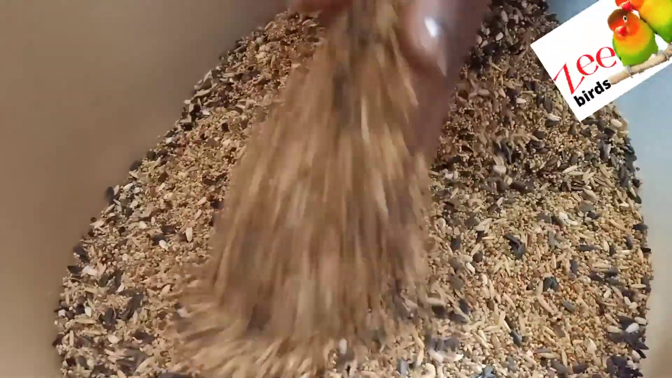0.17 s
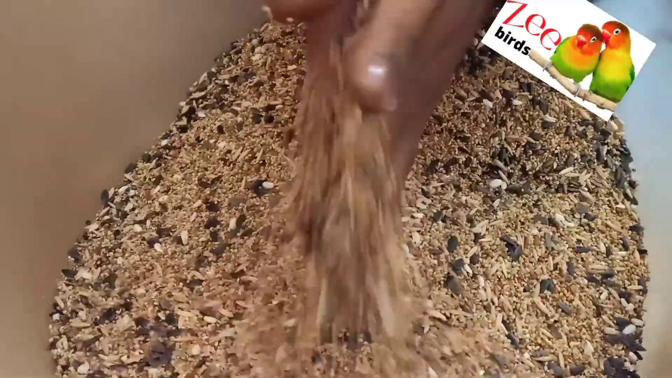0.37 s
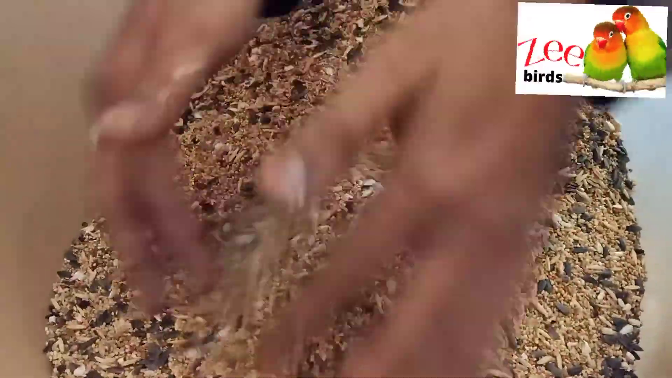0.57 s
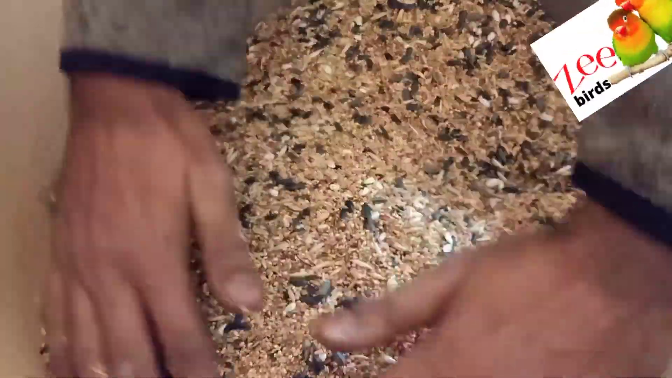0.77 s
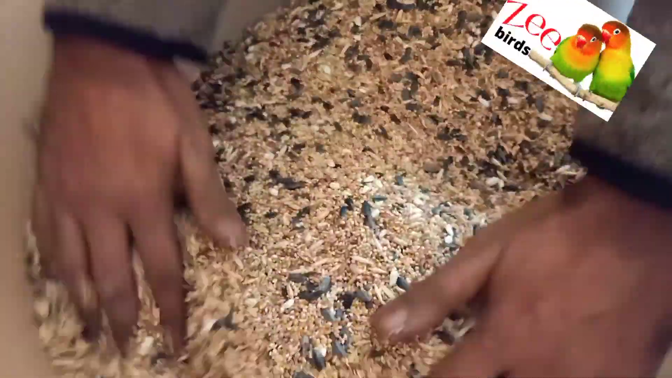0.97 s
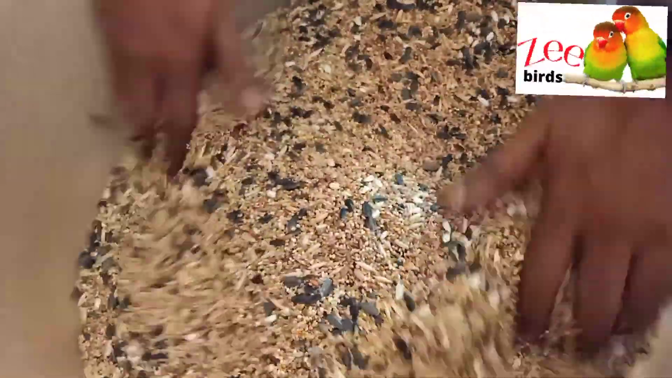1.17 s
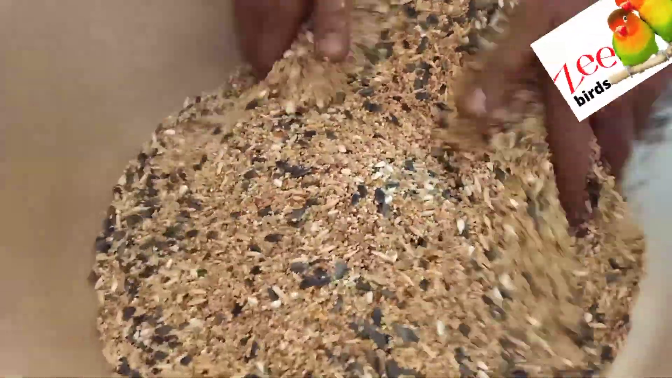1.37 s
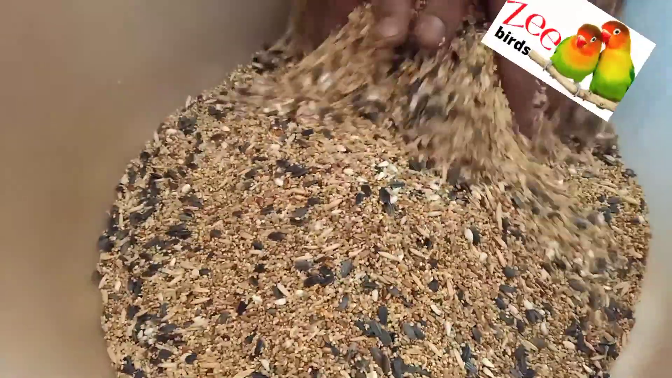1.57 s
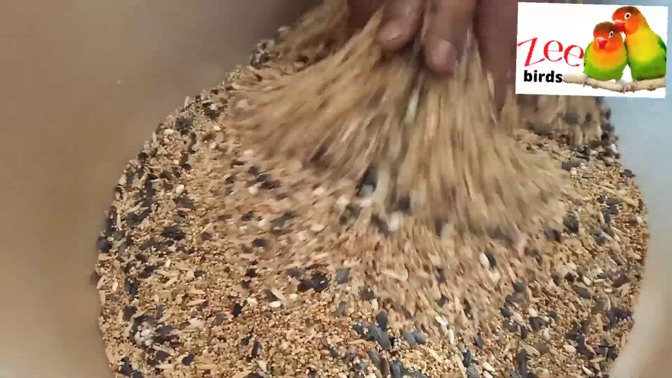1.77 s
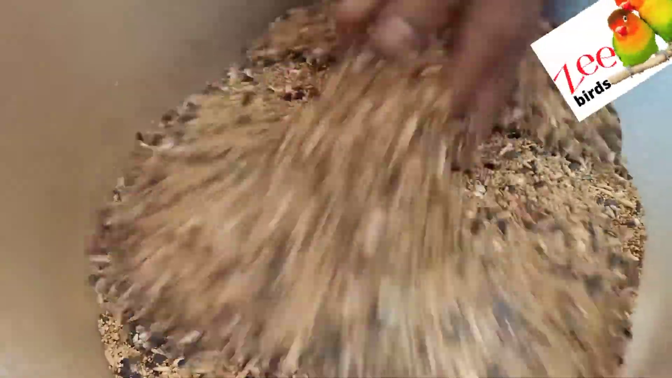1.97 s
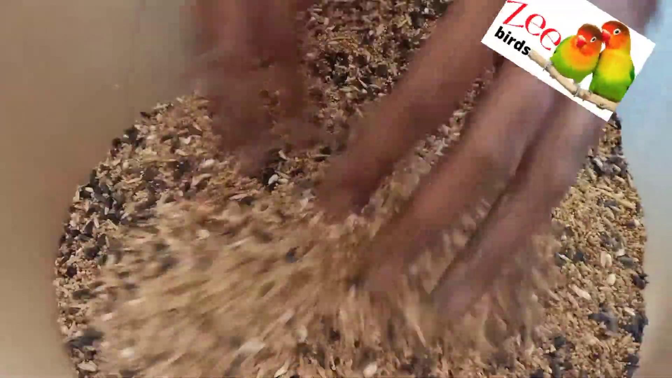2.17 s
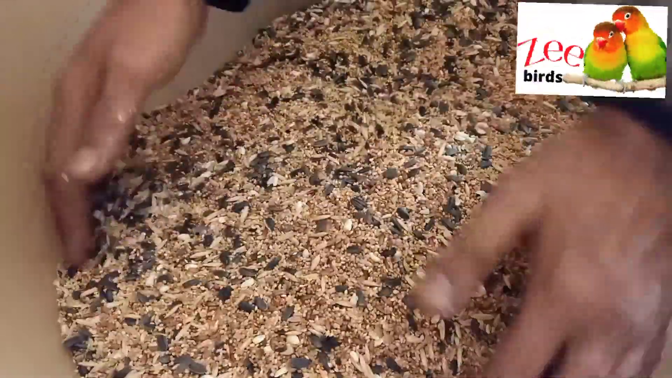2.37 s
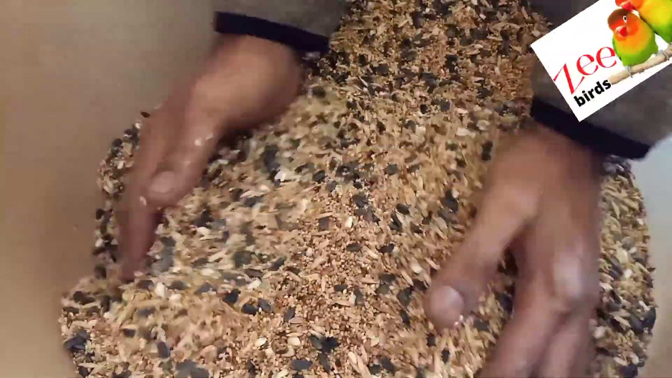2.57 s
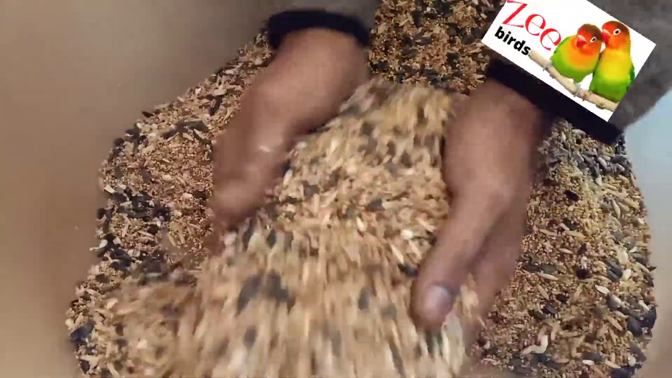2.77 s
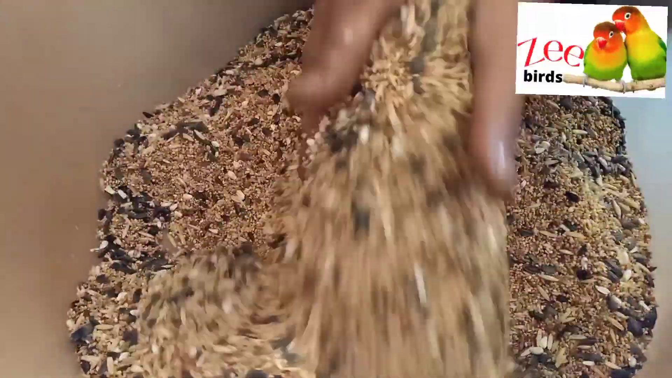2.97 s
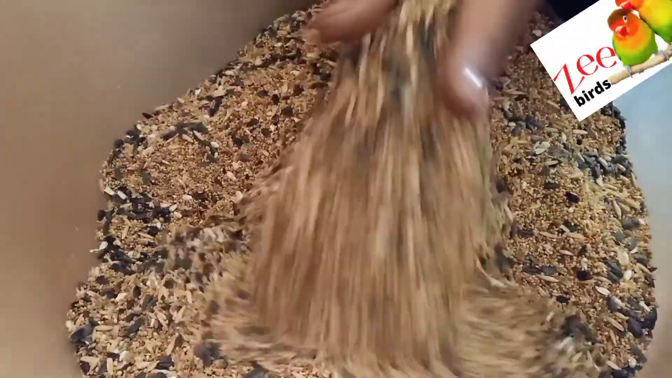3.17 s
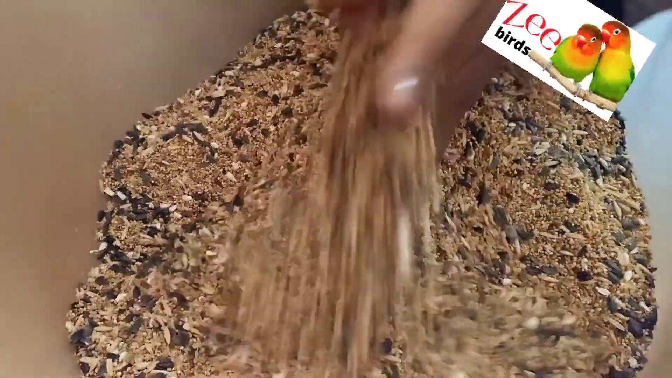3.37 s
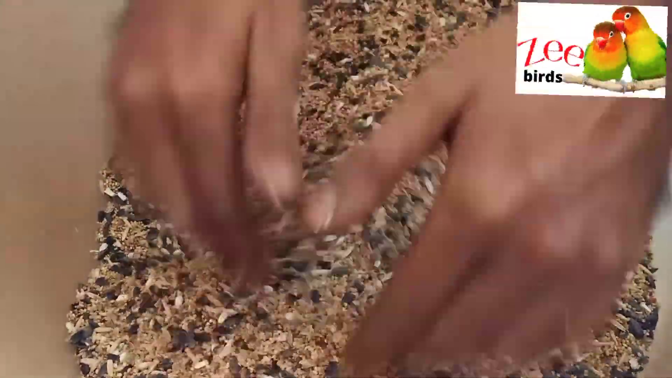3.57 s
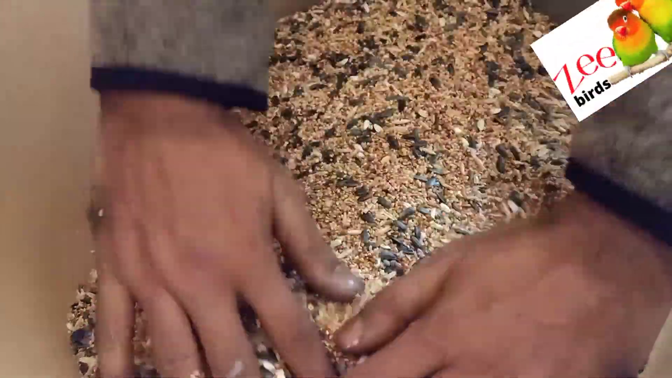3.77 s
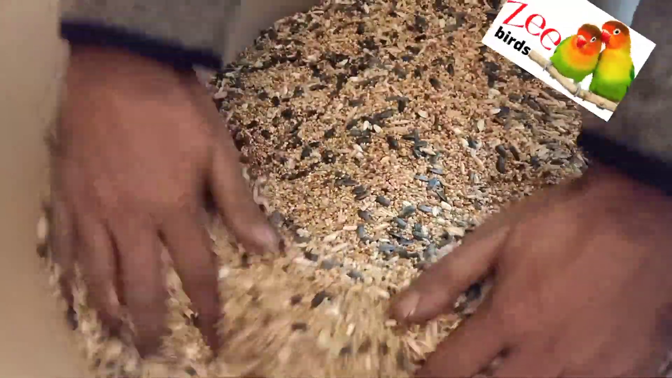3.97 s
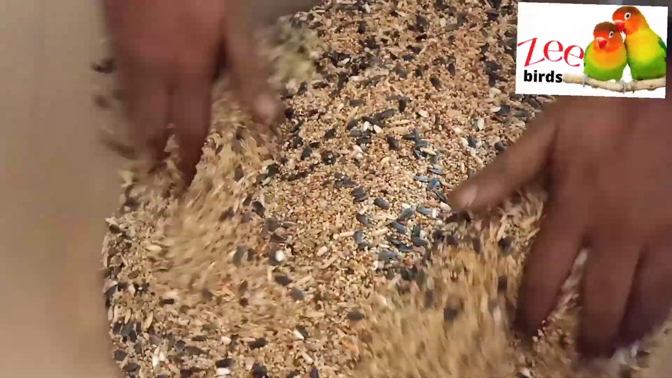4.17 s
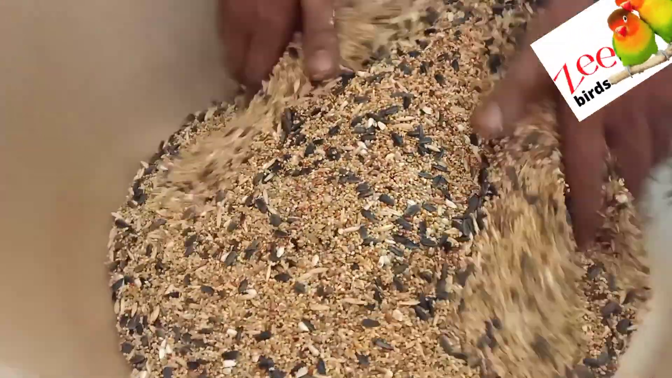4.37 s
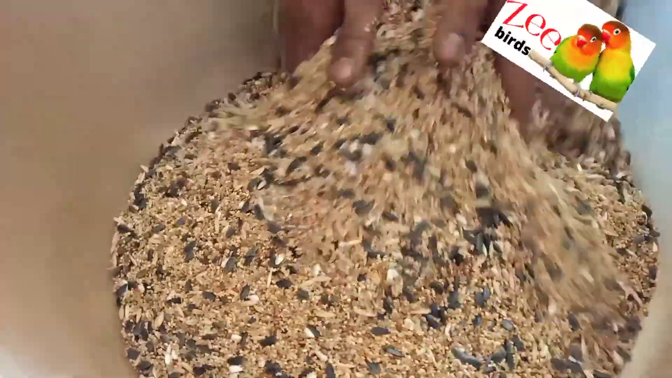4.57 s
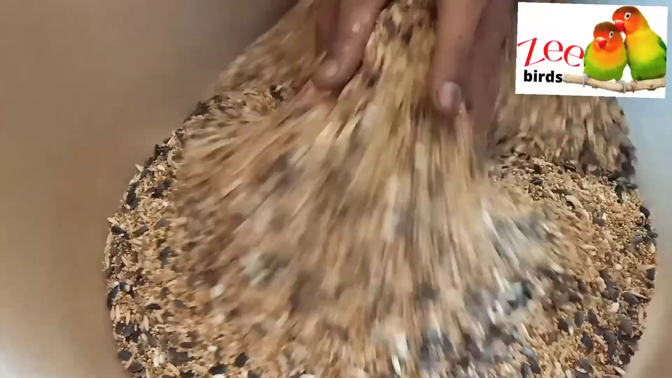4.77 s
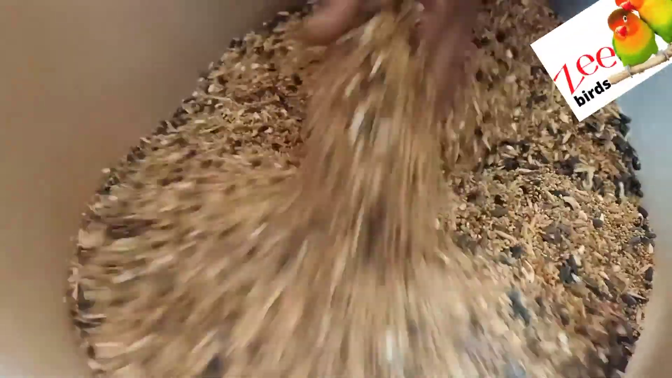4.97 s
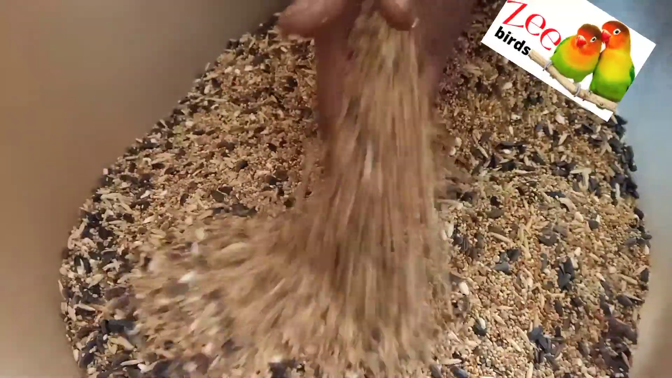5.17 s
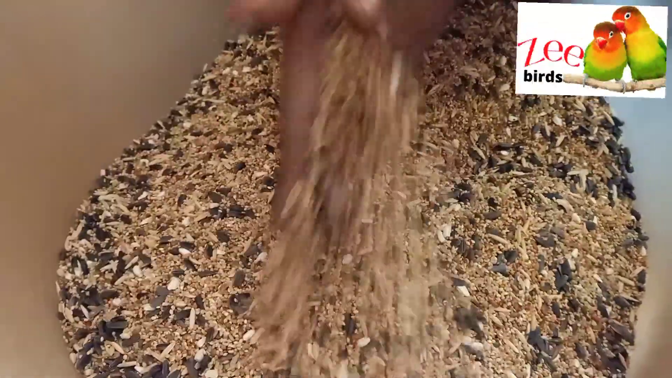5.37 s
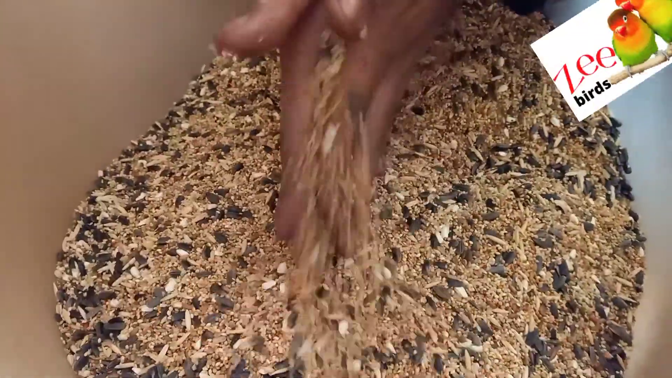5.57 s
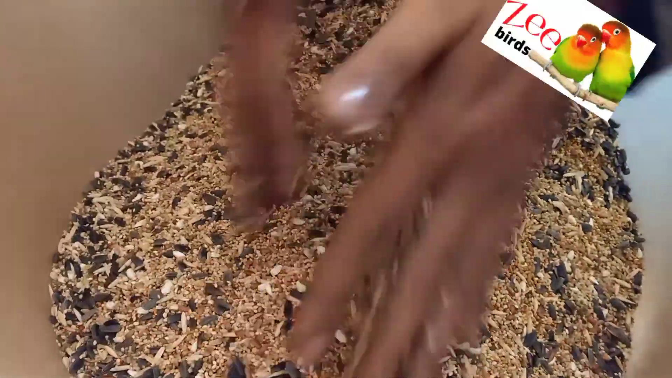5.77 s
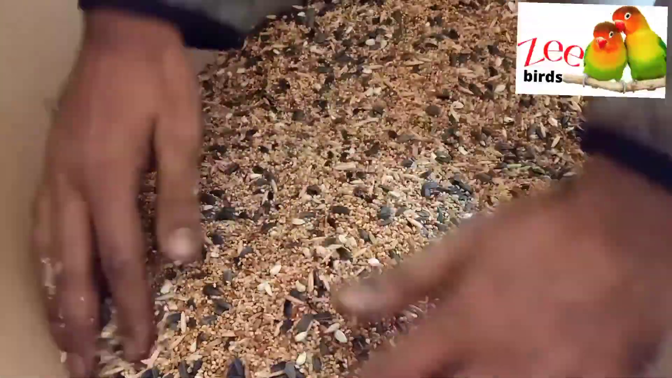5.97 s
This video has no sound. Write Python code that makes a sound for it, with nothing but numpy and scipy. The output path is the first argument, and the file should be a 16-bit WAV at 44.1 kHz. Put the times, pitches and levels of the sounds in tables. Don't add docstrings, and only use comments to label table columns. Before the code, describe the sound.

Close stereo seed stirring in a small room: thousands of tiny grains blur into a dry, gritty hiss that swells with each push of the palms and thins to a trickle between. Clumps and knuckles rap the plastic wall, and palms thud softly on the floor. Two long sweeps frame a pour with dense knocks, a distant bird chirps briefly midway, and a sharp crackle precedes the sparse, ticking end.

```python
import sys
import numpy as np
from scipy import signal
from scipy.fft import rfft, irfft
from scipy.io import wavfile
from scipy.ndimage import uniform_filter1d

SR = 44100
rng = np.random.default_rng(int(sys.argv[2]) if len(sys.argv) > 2 else 0)


def volts_from_db(level):
    exponent = np.asarray(level, float) / 20
    return 10 ** exponent


def transcribe(u):
    v = np.clip(np.atleast_2d(u).T, -1, 1)
    q = np.round(v * 32767).astype(np.int16)
    wavfile.write(sys.argv[1], SR, q)


N = 264996

BURIED = np.array([[1.], [0], [0], [0]])
HEAVY = np.array([[1.], [1], [0], [0]])


def evened(x):
    return x / np.sqrt(np.mean(x ** 2) + 1e-20)


def read(points, hz):
    f, value = np.transpose(points)
    return np.interp(np.log(hz + 1), np.log(f + 1), value)


def causal(gain, size=1024):
    log_gain = np.log(np.maximum(np.concatenate([gain, gain[-2:0:-1]]), 1e-4))
    return np.fft.ifft(np.exp(np.conj(signal.hilbert(log_gain)))).real[:size]


def slow(rate_hz, count=30):
    t = np.arange(0, N + 64, 64) / SR
    hz = np.geomspace(rate_hz / 20, rate_hz, count)
    phase = rng.random(count)
    wave = np.sin(2 * np.pi * (hz * t[:, None] + phase)) @ hz ** -.3
    return evened(np.interp(np.arange(N) / SR, t, wave))


def hum():
    # pitch_hz, level_db (per Hz)
    room_colour = [(15, -35), (25, -7), (81, 4), (140, 12.5), (198, 9), (248, -17), (292, 4), (345, -14),
                   (407, 1), (628, -15), (900, -46), (1170, -60), (1980, -120)]
    level_db, mains_hz, mains_db = -71, 49, -79.5
    common, left, right = rng.standard_normal((3, N))
    noise = common + .38 * np.array([left, right])
    gain = volts_from_db(read(room_colour, np.fft.rfftfreq(N, 1 / SR)))
    noise = evened(irfft(rfft(noise) * gain, N))
    mains = volts_from_db(mains_db) * np.sin(2 * np.pi * mains_hz * np.arange(N) / SR)
    return volts_from_db(level_db + 0.95 * slow(7.2)) * noise + mains


def thuds():
    # start_s, peak_db
    floor_pushes = [(0.699, -77), (0.949, -62), (1.396, -56), (1.549, -63.5), (1.799, -61.5), (2.129, -88),
                    (2.419, -54), (2.499, -53), (2.601, -54), (2.779, -60), (3.138, -65), (3.599, -71),
                    (3.799, -71), (3.98, -56.5), (4.299, -63), (4.499, -68), (4.815, -62)]
    t = np.arange(N) / SR
    common, left, right = rng.standard_normal((3, N))
    band = signal.butter(3, [110, 230], "band", fs=SR, output="sos")
    rumble = evened(signal.sosfilt(band, common + .3 * np.array([left, right])))
    swell = np.zeros(N)
    for start_s, peak_db in floor_pushes:
        late = np.maximum(t - start_s, 0) / 0.014
        swell += volts_from_db(peak_db + 0.5) * late * np.exp(1 - late)
    return rumble * swell


def bird():
    # time_s, level_db, pitch_hz
    whistle = [
        (3.222, -70, 5750),
        (3.244, -42, 6150),
        (3.262, -52, 6300),
        (3.278, -42.5, 6200),
        (3.29, -57, 6200),
        (3.30, -51, 6150),
        (3.335, -58, 6100),
    ]
    # time_s, level_db, pitch_hz, half_length_s
    pip = (3.23, -54, 4800, .006)
    s, level_db, hz = np.transpose(whistle)
    t = np.arange(N) / SR
    flutter = 1 + 0.6 * np.sin(2 * np.pi * 190 * t + 1.0 * slow(140.0))
    pitch_hz = np.interp(t, s, hz) + 150 * slow(200.)
    tone = np.sin(2 * np.pi * np.cumsum(pitch_hz) / SR) * flutter
    tone = tone * volts_from_db(np.interp(t, s, level_db, -120, -120))
    pip_s, pip_db, pip_hz, half_s = pip
    pip_swell = volts_from_db(pip_db) * np.exp(-((t - pip_s) / half_s) ** 2)
    tone = tone + pip_swell * np.sin(2 * np.pi * pip_hz * t)
    return np.array([1.3 * tone, 0.83 * np.roll(tone, 2)])


def tub(x):
    t60_s = .09
    at = np.arange(40, 6000, 20) + rng.integers(0, 20, (2, 298))
    taps = np.zeros((2, 6020))
    echoes = rng.choice([-1., 1.], at.shape) * volts_from_db(-60 * at / SR / t60_s)
    np.put_along_axis(taps, at, echoes, 1)
    return signal.oaconvolve(x, taps / np.linalg.norm(taps[0]), axes=1)[:, :N]


def struck(blows, crack_db, t60_s):
    out, t = np.zeros((2, N + SR)), np.arange(1500) / SR
    bright = signal.butter(2, [3300, 7400], "band", fs=SR, output="sos")
    push = np.sin(2 * np.pi * 380 * t) * volts_from_db(-60 * t / 0.013)
    fade = volts_from_db(-60 * t / max(t60_s, .003)) * (1 - np.exp(-t / .0003))
    for start_s, peak_db, hz, weight_db in blows:
        noise = rng.standard_normal((2, len(t)))
        ring = .65 * np.sin(2 * np.pi * hz * t)
        ring = ring + .3 * np.sin(2 * np.pi * (1.9 * hz * t + noise[:, :1]))
        snappy = signal.butter(3, [.6 * hz, 900 + 1.3 * hz], "band", fs=SR, output="sos")
        snap = .75 * evened(signal.sosfilt(snappy, noise))
        crack = evened(signal.sosfilt(bright, noise)) * volts_from_db(crack_db + 12.5)
        blow = (ring + snap + crack) * fade + volts_from_db(weight_db) * push
        at = round(start_s * SR)
        out[:, at:at + len(t)] += blow * volts_from_db(peak_db + np.array([[3], [0]]))
    return signal.sosfilt(signal.butter(2, [200, 7800], "band", fs=SR, output="sos"), out[:, :N])


def drops():
    # start_s, peak_db, pitch_hz
    falling = [(.2694, -80, 2680), (.383, -37, 2790), (0.484, -48, 1060), (.5424, -48, 1490),
               (0.557, -49, 2700), (0.578, -48, 2760), (2.259, -42, 1320), (3.1794, -38, 2590),
               (3.418, -40, 2610), (3.619, -53, 1210), (3.704, -50, 1910), (5.311, -39, 2070),
               (5.3285, -44, 2100), (5.36, -47, 1210), (5.5136, -38, 1390), (5.6237, -43, 2420),
               (5.685, -44, 2370), (5.756, -58, 1300), (5.8157, -61, 2648), (5.8436, -40, 1830),
               (5.982, -69, 1100)]
    return struck([(*row, -34) for row in falling], crack_db=-14, t60_s=0.0055)


def snaps():
    # start_s, peak_db, pitch_hz
    cracking = [(0.853, -39, 1040), (2.301, -48, 2580), (4.92, -41, 2620), (4.94, -39, 2780),
                (4.981, -30, 2400), (4.988, -36, 2900), (4.996, -35, 2580), (5.003, -29, 2400),
                (5.015, -25, 2420), (5.019, -36, 2920), (6.004, -34.5, 1500), (5.122, -41, 2270),
                (5.254, -51, 2700), (5.49, -43, 1400), (5.672, -40.5, 2160)]
    return struck([(*row, -38) for row in cracking], crack_db=-3, t60_s=0.0057)


def clumps():
    # start_s, peak_db, pitch_hz
    wall_hits = [(.001, -22, 2480), (.679, -39, 1260), (0.685, -30, 2020), (.695, -26.5, 1350),
                 (.701, -30.5, 1390), (.711, -35.5, 1340), (.717, -38, 1264), (2.121, -38, 2570),
                 (2.243, -40.5, 1200), (2.247, -39.5, 1310), (2.315, -39.5, 1250), (2.338, -53, 2960),
                 (2.358, -41, 2560), (2.367, -29, 2120), (2.888, -41, 1300), (2.912, -36, 1330),
                 (2.931, -32.5, 1400), (3.506, -41, 2060), (5.012, -40, 2450), (5.433, -37.5, 2120),
                 (5.527, -43, 2280), (5.602, -43, 1280), (5.865, -42, 2360), (5.899, -41.5, 1260),
                 (5.927, -36.5, 1400), (5.949, -43, 1300), (5.955, -31, 1340), (5.97, -34, 1650),
                 (5.991, -38, 1170)]
    return struck([(*row, -38) for row in wall_hits], crack_db=-15.5, t60_s=0.017)


def knuckles():
    # start_s, peak_db, pitch_hz, low_weight_db
    knocks = [(0.745, -43, 1240, -24), (.754, -25.5, 1150, -10.5), (0.778, -40, 790, -6),
              (.794, -31, 1010, -8), (.821, -31, 1120, -5), (.83, -33, 1170, -27), (.835, -38, 926, -17),
              (2.38, -23.5, 900, -20), (2.391, -25, 790, -23), (2.405, -27, 790, -11),
              (2.416, -25.5, 890, -16), (2.43, -30, 814, -4.5), (2.441, -32.5, 463, -26),
              (2.566, -30, 740, -22), (2.598, -31.5, 720, -29), (3.77, -28, 1060, -19),
              (3.78, -25.5, 1140, -4.5)]
    return struck(knocks, crack_db=-24.5, t60_s=0.014)


def column(values):
    return np.array(values, float)[:, None]


def stroke(t, start, length, db, change_db, rise_s, fall_s):
    held_db = db + change_db * np.clip((t - start) / length, 0, 1)
    before = np.maximum(start - t, 0) / rise_s
    after = np.maximum(t - start - length, 0) / fall_s
    return volts_from_db(held_db - 20 * (before + after)) ** 2


def trickling(t):
    # time_s, flow_db, seed_weight_db
    flow = [(0, -56.5, -15), (.27, -57.5, -7), (.45, -58.5, -1), (.62, -58, -6.5), (.8, -61.5, -8),
            (1.901, -60.5, 9), (2.27, -60, 0), (2.7, -57.5, 1), (2.82, -68, -7), (3.0, -60.5, 3),
            (3.2, -56, -4), (3.55, -55, -3), (3.75, -64.5, 6), (4.85, -60.5, 5.5), (5.25, -58, -4.5),
            (5.45, -57.5, 2.5), (5.8, -63, -1.5), (5.9, -56.5, -4)]
    share_db = [-17, -0.5, -1.5, 2.5]
    usual_db, dust_slope = -57, 1.33
    s, flow_db, weight_db = np.transpose(flow)
    flow_db = np.interp(t, s, flow_db)
    dusty_db = column([0, 0, 0, dust_slope - 1]) * (flow_db - usual_db)
    heavy_db = HEAVY * np.interp(t, s, weight_db)
    return volts_from_db(flow_db + dusty_db + column(share_db) + heavy_db) ** 2


def sliding(t):
    # start_s, length_s, flow_db, change_db
    slides = [
        (1.022, 0.12, -39, 1),
        (1.179, 0.33, -36.5, -8),
        (4.028, 0.11, -37.5, -1),
        (4.2, 0.29, -37, -4),
        (4.55, 0.12, -52.5, 2),
    ]
    share_db = [-42, -5, 0, -9.5]
    return sum(stroke(t, s, length, db + column(share_db), change_db, rise_s=0.2, fall_s=0.16)
               for s, length, db, change_db in slides)


def splashing(t):
    # start_s, length_s, strength_db, weight_db
    handfuls = [(0.001, 0.0015, -27.5, -3), (0.694, 0.015, -44, -2.5), (0.852, 0.023, -50, -1.5),
                (2.026, 0.058, -38.5, -20), (2.117, 0.04, -37, -4.5), (2.305, 0.025, -51, 0),
                (2.366, .015, -54, 5), (2.415, 0.044, -47.5, -10), (2.532, 0.048, -47, 0),
                (2.914, 0.012, -48, 2), (3.23, .004, -49.5, -17), (3.5, 0.011, -52.5, -3),
                (3.812, 0.0032, -48, 0.5), (4.889, 0.068, -45.5, -28), (4.995, 0.03, -33, -6),
                (5.493, 0.057, -56, 1.5), (5.871, .01, -55, 6), (5.95, 0.0048, -55, 6), (6.0, .01, -45, 9)]
    share_db = [-29, -1, -0.5, -13]
    fall_s = [0.14, .09, 0.039, 0.09]
    rise_s, late_s, settle_db, settle_s = .045, .018, -10, 0.15
    power = 0
    for s, length, db, weight_db in handfuls:
        shifted = t - HEAVY * late_s * (s > late_s)
        grain_db = db + column(share_db) + HEAVY * weight_db
        power = power + stroke(shifted, s, length, grain_db, 0, rise_s, column(fall_s))
        power = power + stroke(shifted, s, length, grain_db + settle_db, 0, rise_s, settle_s)
    return power


def pushing(t):
    # start_s, length_s, force_db, change_db, depth_db
    pushes = [(0.018, .05, -64, -9, 17), (2.14, 0.031, -66.5, 1.5, 5.5), (5.03, 0.041, -62, -4.5, 5.5),
              (0.767, 0.18, -55.5, 2.5, 1), (0.976, .84, -43.5, -4.5, -3), (1.843, 0.12, -52, -0.5, -11.5),
              (2.381, 0.076, -45.5, -4, -12), (2.47, 0.082, -56, 3, 0), (2.572, 0.074, -45.5, -4.5, -4),
              (2.637, 0.12, -45.5, 1, -8), (2.848, 0.28, -51.5, 0, -14.5), (3.786, 0.18, -49.5, 5, -6),
              (3.968, 0.54, -43, -3, -4), (4.526, 0.29, -46, -2, -6), (5.76, 0.088, -69.5, 3, -1.5)]
    share_db = [0, 0, -12.5, -16]
    deep_sag = 1.36
    power = 0
    for s, length, db, change_db, depth_db in pushes:
        grain_db = db + column(share_db) + BURIED * depth_db
        grain_change_db = change_db * (1 + (deep_sag - 1) * BURIED)
        rise_s = 0.025 + 0.1 * length
        power = power + stroke(t, s, length, grain_db, grain_change_db, rise_s, .12)
    return power


def stirring():
    action_per_s = [5130, 4530, 1500, 1400]
    t = np.arange(0, N + 32, 32) / SR
    power = np.array([pushing(t), sliding(t), splashing(t), trickling(t)])
    per_s = action_per_s @ power.sum(1) / power.sum((0, 1))
    level_db = 10 * np.log10(power.sum(0))
    samples_s = np.arange(N) / SR
    return [np.interp(samples_s, t, db) for db in level_db], np.interp(samples_s, t, per_s)


def collisions(per_s, size_db, count=8):
    spread_s = .0003
    chance, size, shape, sign = rng.random((4, N))
    lag = np.round(spread_s * SR * rng.standard_normal(N)).astype(int)
    at = np.flatnonzero(chance < per_s / SR)
    strength = volts_from_db(size_db * np.minimum(-np.log(size[at]), 5))
    blow = strength * np.sign(sign[at] - .5) / np.sqrt(per_s[at])
    trains = np.zeros((2, count, N))
    kind = (shape[at] * count).astype(int)
    trains[0, kind, at] = blow
    np.add.at(trains[1], (kind, np.clip(at + lag[at], 0, N - 1)), blow)
    return trains


def seeds():
    ring_s = [0.0044, 0.014, 0.0091, 0.0011]
    # pitch_hz, level_db (per Hz)
    seed_colour = [(110, -56), (180, -11.5), (225, -17), (287, -2), (333, -6.5), (552, -1), (629, -2.5),
                   (744, 1.5), (1000, -0.5), (1600, -6), (2410, -5), (4380, -12.5), (6130, -6), (9600, -24),
                   (15600, -20.5)]
    # pitch_hz, width_hz, level_db
    resonances = [(1000, 130, -4.5), (2350, 500, 1), (3400, 1200, 2.2), (6200, 320, 3.5)]
    # pitch_hz, steepness (no unit)
    borders = [(980, 24.4), (4200, 3.25), (7800, 4.5)]
    blur = [.1, 0.33, .4, 1.1]
    left_db = [1.2, 3.1, 4, 0.053]
    level_db, per_s = stirring()
    trains = collisions(np.clip(per_s, 300, 30000), size_db=0.36)
    trains = trains / np.sqrt(np.mean(trains ** 2))
    dust = rng.standard_normal((2, N))
    surge_db = 0.36 * slow(40.)
    hz, t = np.fft.rfftfreq(4096, 1 / SR), np.arange(600) / SR
    resonance_db = sum(db / (1 + ((hz - f) / width) ** 2) for f, width, db in resonances)
    colour = volts_from_db(read(seed_colour, hz) + resonance_db)
    below = [0] + [1 / (1 + (hz / edge) ** steep) for edge, steep in borders] + [1]
    out = np.zeros((2, N))
    for k in range(4):
        rattle = rng.standard_normal((len(trains[0]), len(t))) * volts_from_db(-60 * t / ring_s[k])
        rattle[:, 0] = 1.95 * np.sign(rattle[:, 0])
        average = np.sqrt(np.mean(abs(rfft(rattle, 4096)) ** 2, 0))
        body = causal(colour * np.sqrt(abs(below[k + 1] - below[k])) / average)
        contacts = evened(signal.oaconvolve(trains, rattle[None], axes=2).sum(1))[:, :N]
        fine_gain = np.interp(np.fft.rfftfreq(N, 1 / SR), hz, average)
        fine = evened(irfft(rfft(np.roll(dust, 5000 * k, 1)) * fine_gain, N))
        layer = signal.oaconvolve(contacts + blur[k] * fine, body[None], axes=1)[:, :N]
        loudness = volts_from_db(level_db[k] + 1 + surge_db + 0.13 * slow(25.))
        out += evened(layer) * loudness * volts_from_db(np.array([[.5], [-.5]]) * left_db[k])
    return out


def drifting(x):
    # start_s, length_s, gain_db
    cupped = [
        (0.977, 0.083, 2),
        (2.525, 0.11, 3.5),
        (2.653, .17, 8),
        (3.954, .15, 3.5),
    ]
    cup_hz = [720, 2270]
    cup_width_hz = [64, 280]
    patch_db, edge_s = 1.3, 0.013
    hz, t, z = signal.stft(x, SR, nperseg=1024, noverlap=768)
    patches = rng.standard_normal(z.shape[1:])
    for _ in range(2):
        patches = uniform_filter1d(uniform_filter1d(patches, size=7, axis=0), size=10, axis=1)
    closed_db = sum(db * np.clip(np.minimum(t - s, s + length - t) / edge_s + .5, 0, 1)
                    for s, length, db in cupped)
    hollow_db = sum(closed_db / (1 + ((hz[:, None] - f) / width) ** 2)
                    for f, width in zip(cup_hz, cup_width_hz))
    z = z * volts_from_db(patch_db * evened(patches) + hollow_db)
    return signal.istft(z, SR, nperseg=1024, noverlap=768)[1][:, :N]


def scene():
    near = drifting(seeds()) + knuckles() + clumps() + snaps() + drops()
    far = bird()
    reflections = volts_from_db(-12) * tub(near + 3.7 * far)
    return near + reflections + far + thuds() + hum()


def masked(x, size=9):
    mask_db, from_hz = -25.5, 7800
    hz, _, z = signal.stft(x, SR, nperseg=2048, noverlap=1024)
    bands = np.arange(len(hz)) // size
    band_power = np.add.reduceat((abs(z) ** 2).sum(0), np.arange(0, len(hz), size))
    band_db = 10 * np.log10(band_power + 1e-20)
    loudest_db = uniform_filter1d(uniform_filter1d(band_db, size=12, axis=0).max(0), size=7)
    luck = evened(uniform_filter1d(rng.standard_normal(band_db.shape), size=2, axis=1))
    weak = band_db + 7 * luck < loudest_db + mask_db
    keep = ~(weak[bands] & (hz > from_hz)[:, None])
    return signal.istft(z * keep, SR, nperseg=2048, noverlap=1024)[1][:, :N]


def top_cut(x):
    return signal.sosfilt(signal.butter(12, 15590, fs=SR, output="sos"), x)


def record(dry):
    low_pass = signal.firwin(1023, 15590, window=("kaiser", 9), fs=SR)
    limited = signal.oaconvolve(dry, low_pass[None], "same")
    return top_cut(masked(limited))


dry = scene()
out = record(dry)
transcribe(out)
```